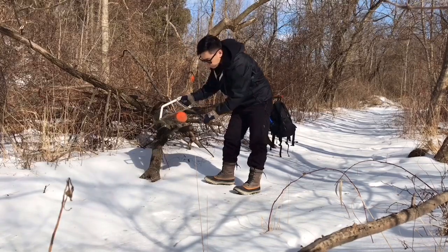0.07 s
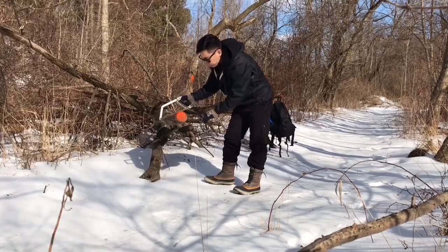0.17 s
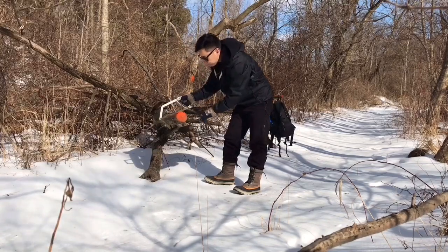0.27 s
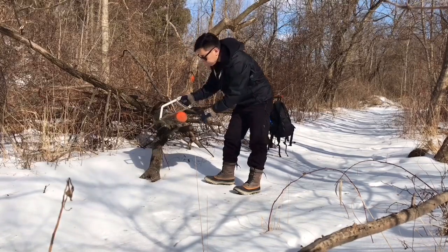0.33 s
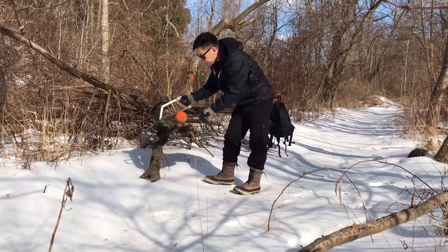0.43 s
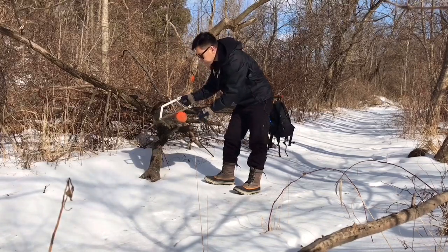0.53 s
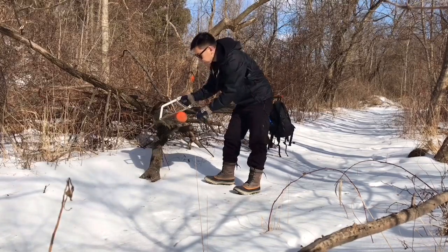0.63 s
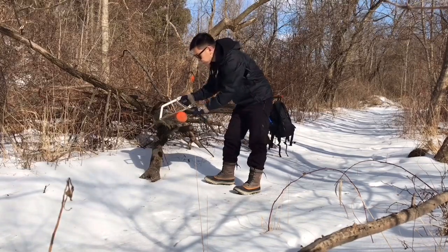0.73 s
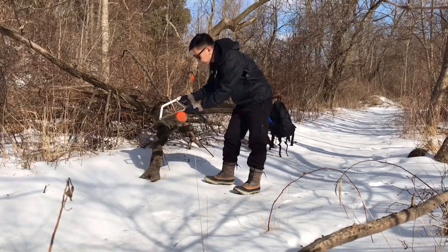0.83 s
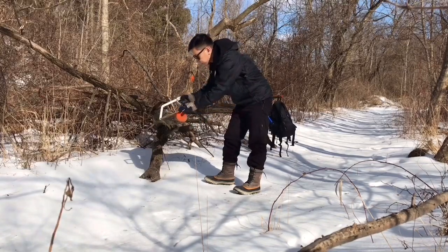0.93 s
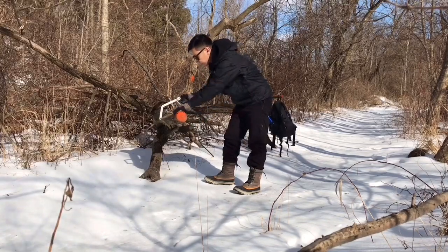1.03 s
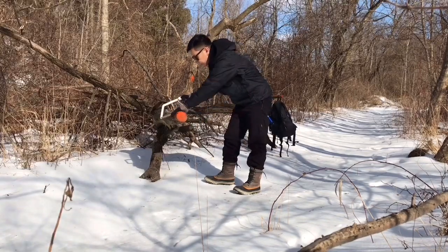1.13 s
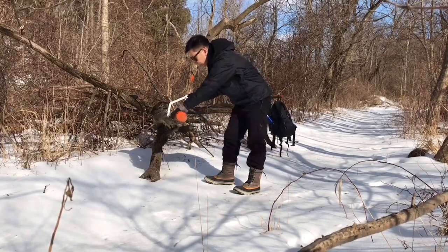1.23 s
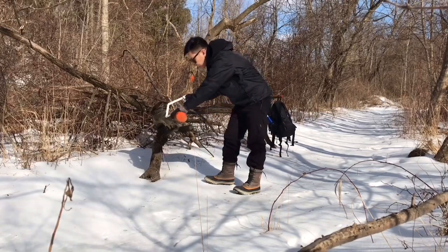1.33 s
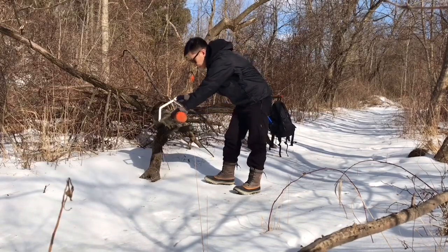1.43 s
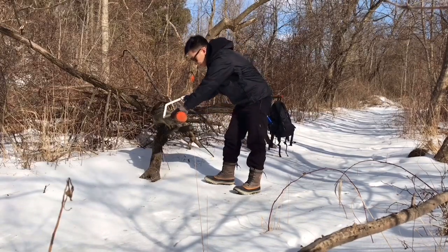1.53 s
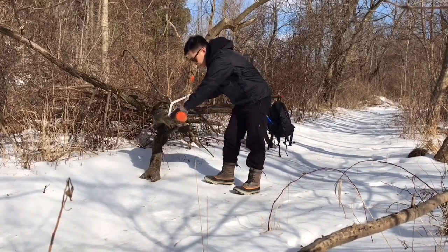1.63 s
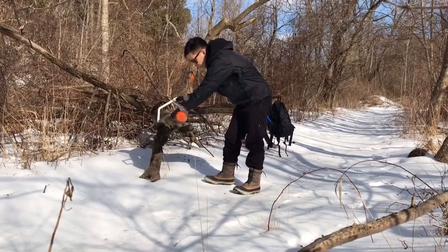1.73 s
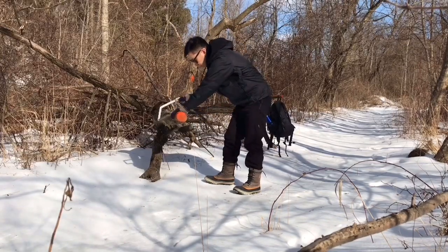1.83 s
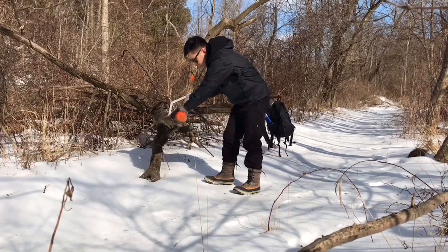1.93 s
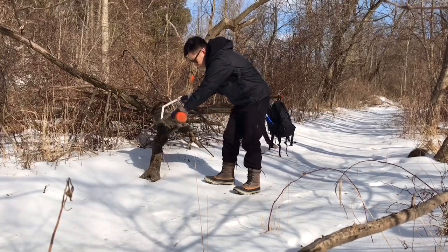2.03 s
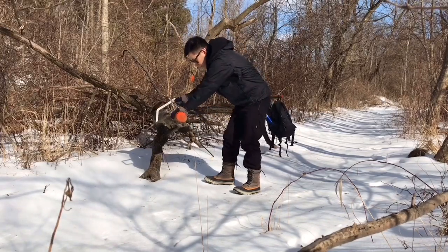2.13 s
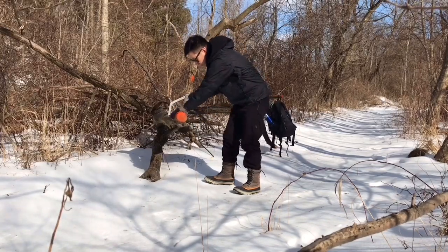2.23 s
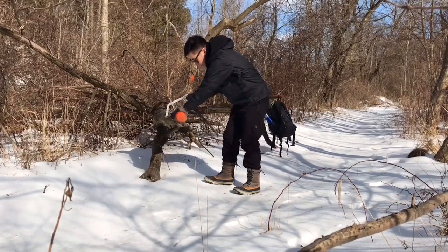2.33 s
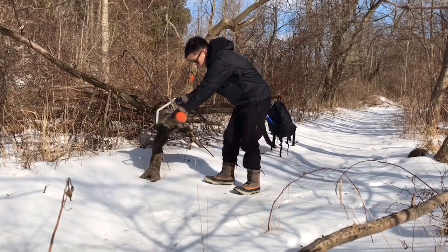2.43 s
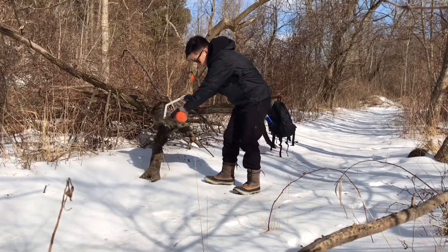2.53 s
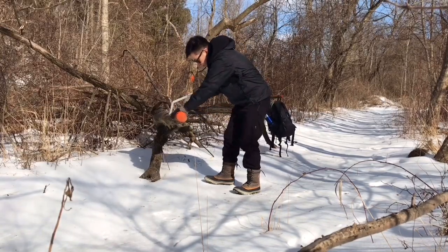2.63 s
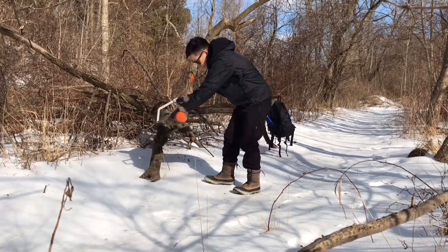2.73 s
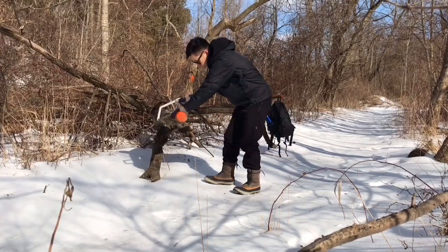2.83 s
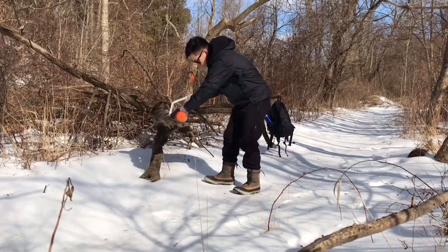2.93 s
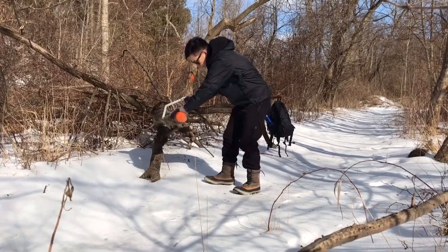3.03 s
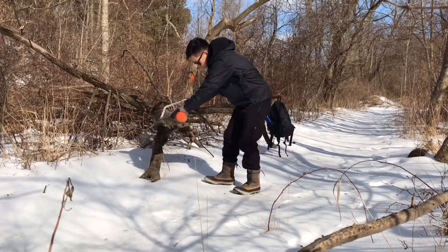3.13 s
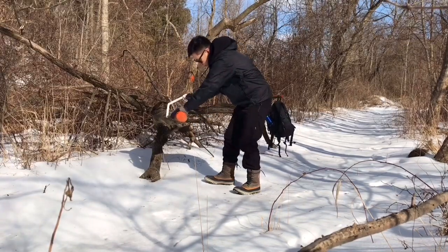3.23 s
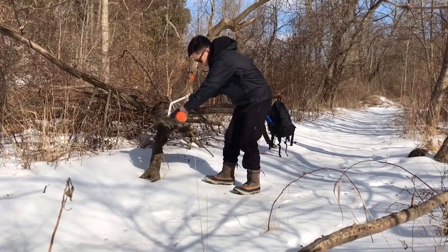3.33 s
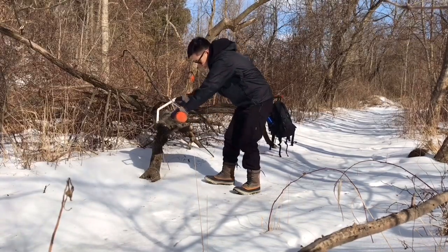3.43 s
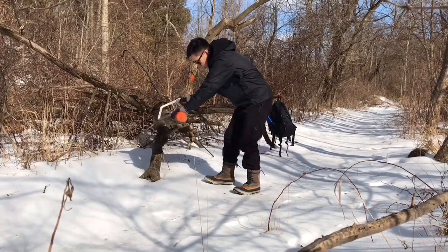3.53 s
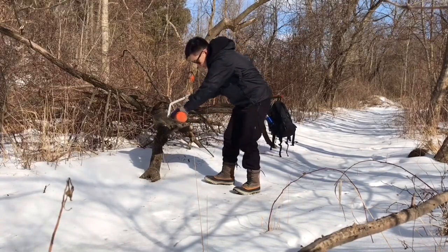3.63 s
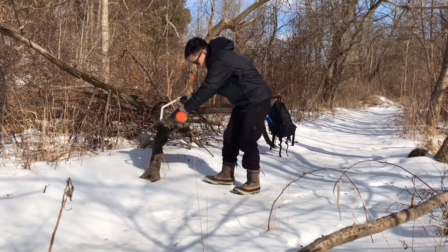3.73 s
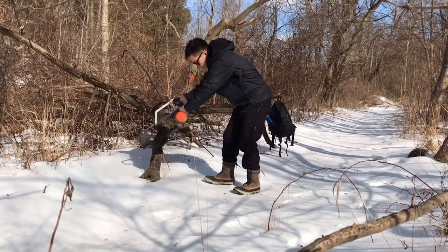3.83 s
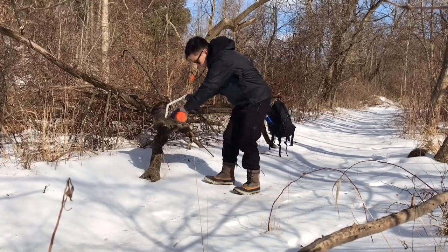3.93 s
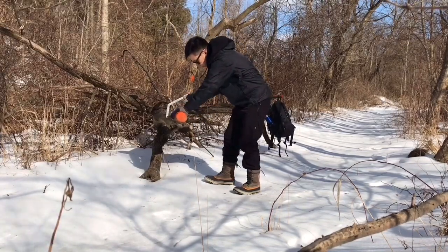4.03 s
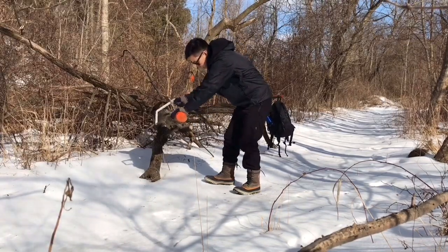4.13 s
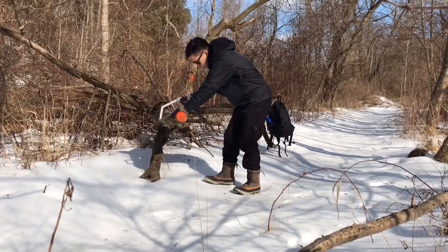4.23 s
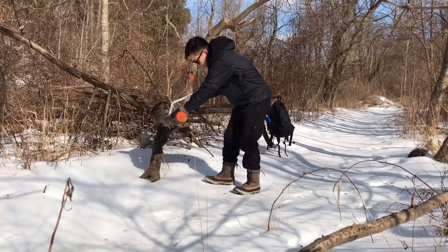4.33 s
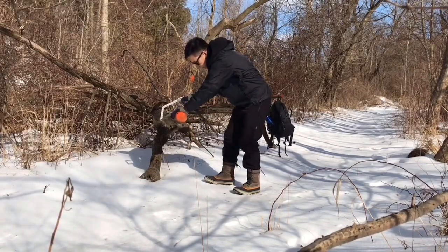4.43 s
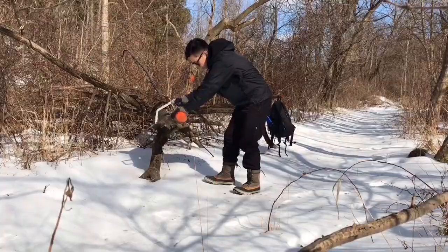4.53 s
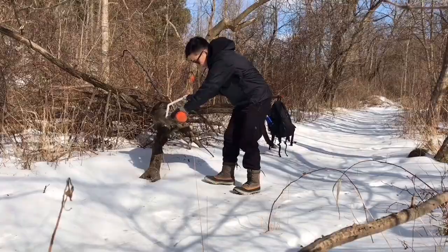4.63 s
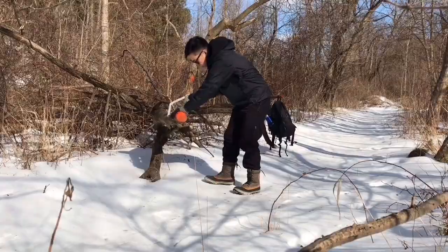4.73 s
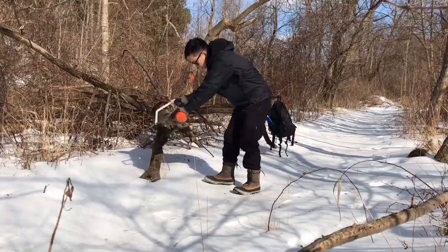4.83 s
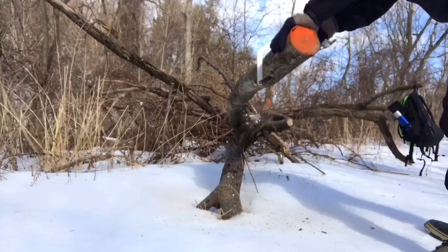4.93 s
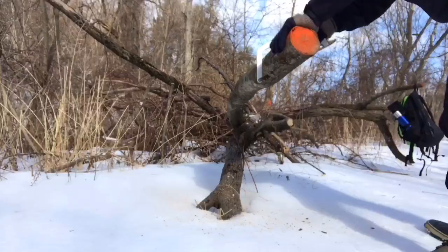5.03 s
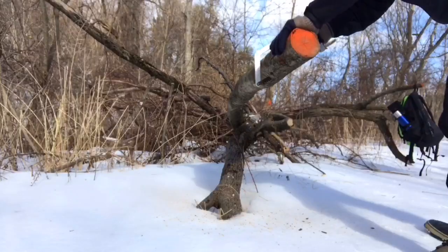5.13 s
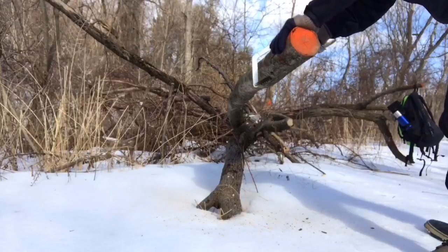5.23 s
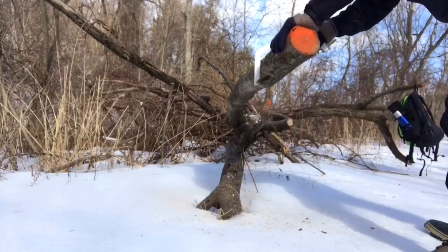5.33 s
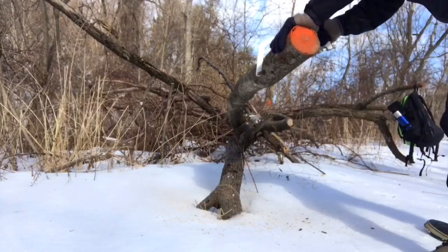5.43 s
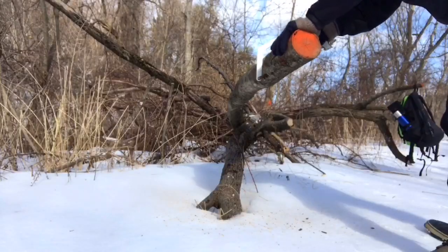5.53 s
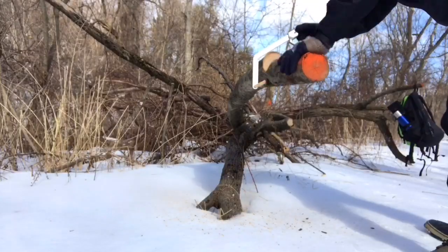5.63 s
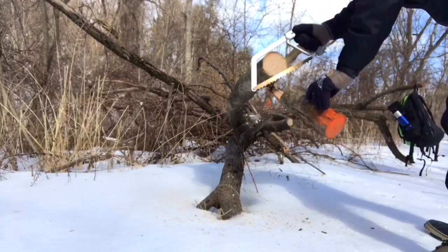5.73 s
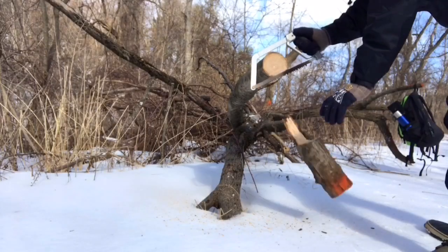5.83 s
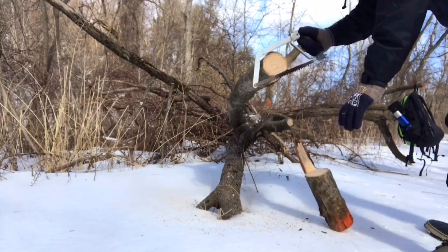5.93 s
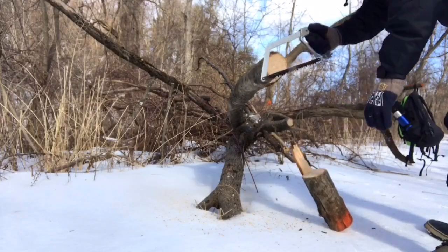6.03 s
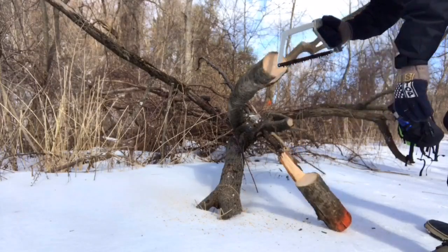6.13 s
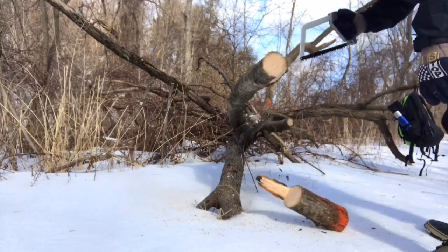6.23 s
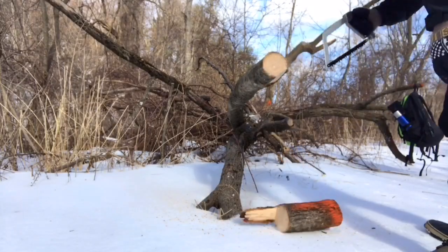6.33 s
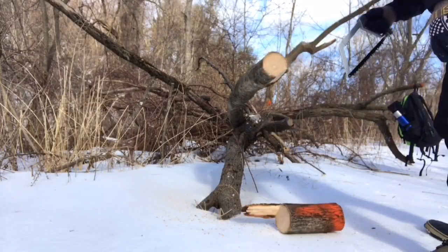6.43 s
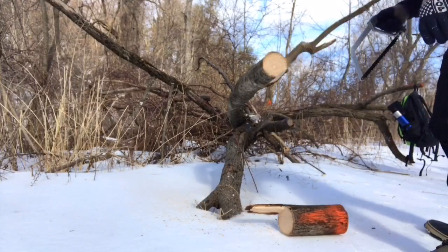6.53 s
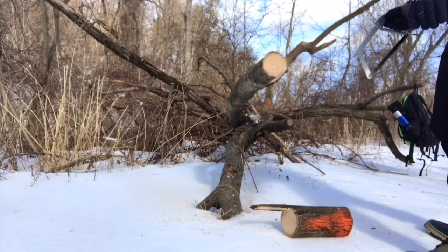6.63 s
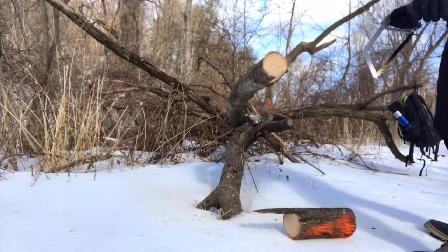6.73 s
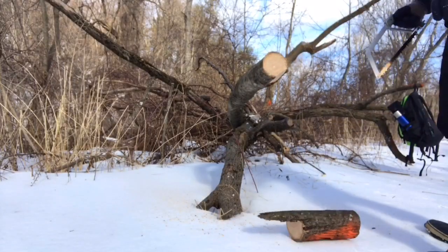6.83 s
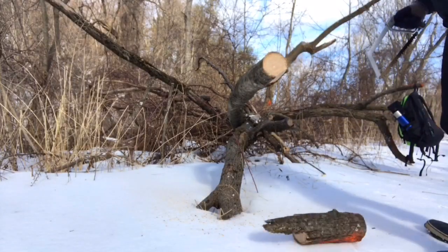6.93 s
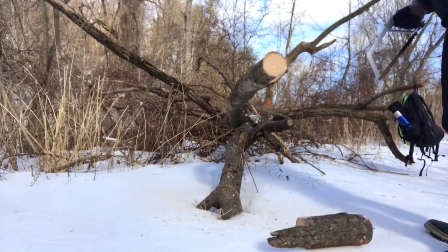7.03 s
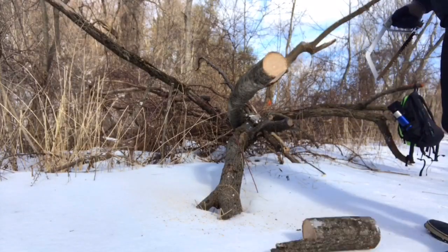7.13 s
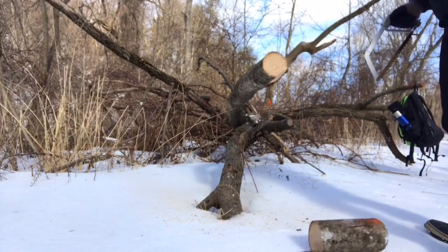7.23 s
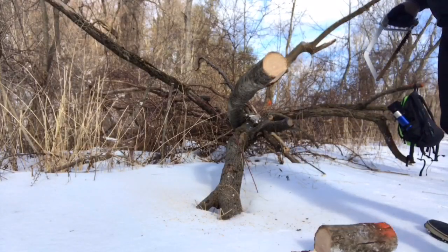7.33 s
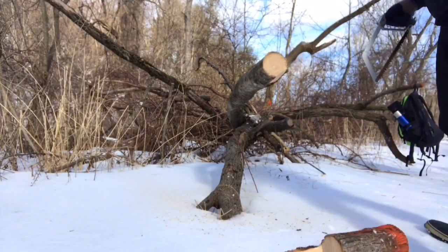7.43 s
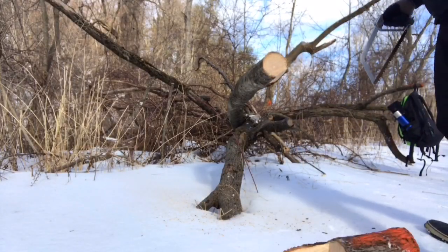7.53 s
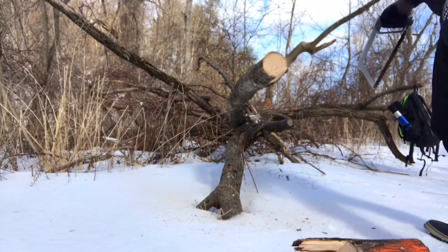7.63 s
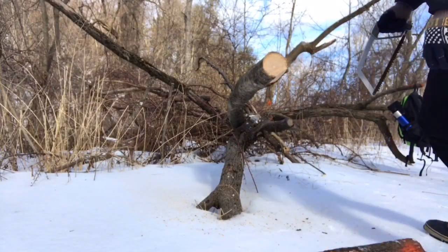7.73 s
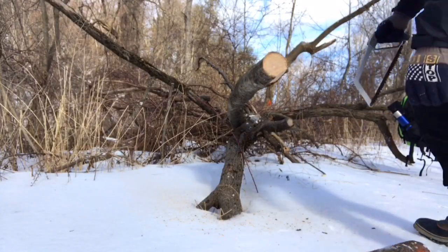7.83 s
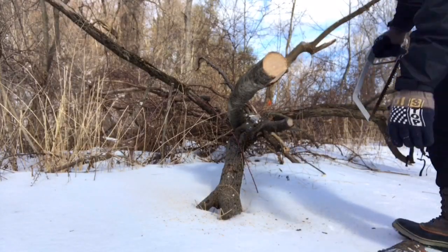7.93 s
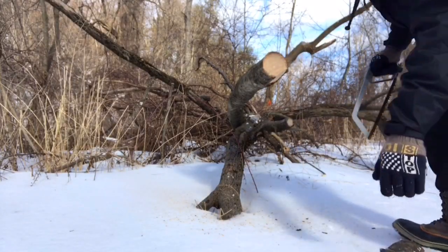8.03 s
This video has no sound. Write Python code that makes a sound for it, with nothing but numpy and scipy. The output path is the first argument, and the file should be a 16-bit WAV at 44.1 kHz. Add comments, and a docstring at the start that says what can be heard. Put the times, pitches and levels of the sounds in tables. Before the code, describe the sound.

Quick even saw strokes with a thin metallic ring, then loud splintering snaps, a log thumping onto crusty snow, rolling, and crunchy footsteps.

```python
"""A small bow saw cuts a dead branch in a snowy wood: grains gated by tooth bites ring blade and wood.
Closer by, the branch gives twice, splinters and snaps loudly twice: slip bursts, ringing modes, dull knocks.
The log drops on crusted snow and rolls, and boots shift: cracks, thuds, ticks and crunching grains.
Noise echoes from brush and trunks answer the sounds, over a distant low rumble and hum."""
import sys
import numpy as np
from scipy import signal
from scipy.fft import rfft, irfft, next_fast_len
from scipy.io import wavfile
from scipy.ndimage import map_coordinates

SR = 44100
rng = np.random.default_rng(int(sys.argv[2]) if len(sys.argv) > 2 else 0)


def file_out(sig):
    """Save sig as 16-bit WAV at sys.argv[1]."""
    # one column per channel
    cols = np.atleast_2d(sig).T
    # limit, then scale
    lim = np.clip(cols, -1, 1)
    pcm = np.round(lim * 32767).astype(np.int16)
    wavfile.write(sys.argv[1], SR, pcm)


N = 355887  # samples


def amp(db):
    """Decibels to amplitude."""
    return 10 ** (np.asarray(db) / 20)


def unit(x):
    """Scale to rms 1."""
    return x / np.sqrt(np.mean(x ** 2) + 1e-20)


def along(points, hz):
    """Interpolate (frequency [Hz], value) points on a log frequency axis."""
    point_hz, values = np.transpose(points)
    return np.interp(np.log(hz + 1), np.log(np.abs(point_hz)), values)


def wobble(knots_per_s):
    """Smooth random curve: a spline through normal random knots."""
    knots = rng.standard_normal(int(N * knots_per_s / SR) + 4)
    coarse = np.linspace(0, N, num=8192)
    curve = map_coordinates(knots, [coarse * knots_per_s / SR])
    return np.interp(np.arange(N), coarse, curve)


def filtered(x, response):
    """Multiply the spectrum of x by a complex response of frequency."""
    size = next_fast_len(len(x) + 8192)
    spectrum = rfft(x, size) * response(np.fft.rfftfreq(size, 1 / SR))
    return irfft(spectrum, size)[:len(x)]


def coloured(x, spectrum):
    """Minimum-phase filter of unit energy, shaped by (frequency [Hz], level [dB]) points."""
    size = 2048
    level_db = np.maximum(along(spectrum, np.fft.rfftfreq(size, 1 / SR)), -90)
    # folding the cepstrum makes the filter causal
    cepstrum = irfft(np.log(amp(level_db)))
    cepstrum[1:size // 2] *= 2
    cepstrum[size // 2 + 1:] = 0
    pulse = irfft(np.exp(rfft(cepstrum)))
    return signal.fftconvolve(x, pulse / np.linalg.norm(pulse))[:len(x)]


def resonant(x, modes):
    """Parallel resonances: (frequency [Hz], width [Hz], level [dB])."""
    def response(f):
        return sum(amp(db) * 1j * f * width / (hz * hz - f * f + 1j * f * width)
                   for hz, width, db in modes)
    return filtered(x, response)


def add(track, start_s, sound):
    """Mix a sound into the track."""
    part = track[round(start_s * SR):][:len(sound)]
    part += sound[:len(part)]


def burst(t, t60_s):
    """Dying run of tiny slips of either sign."""
    return np.sign(rng.standard_normal(len(t))) * amp(-60 * t / max(t60_s, .001))


def grains(per_s, spread_db):
    """Random impulses of uneven size, rms 1."""
    hits = rng.random(N) < per_s / SR
    return unit(hits * rng.standard_normal(N) * amp(spread_db * rng.standard_normal(N)))


def swell(t, start_s, length_s, rise_share):
    """Smooth rise from 0 to 1 and back, highest at the given share of its length."""
    top_s = start_s + length_s * np.clip(rise_share, .05, .95)
    half_turns = np.interp(t, [start_s, top_s, start_s + length_s], [0, .5, 1])
    return np.abs(np.sin(np.pi * half_turns))


def thud(t, hz, sag, life_cycles):
    """Low push whose pitch sinks from (0.67 + sag) towards 0.67 times hz as it dies."""
    cycles = hz * t
    settling = np.exp(-cycles / (0.11 * life_cycles))
    phase = np.cumsum(hz * (0.67 + sag * settling)) / SR
    return np.sin(2 * np.pi * phase) * amp(-60 * cycles / life_cycles) * (1 - settling)


def fracture(t, t60_s, slips_db, lag_s):
    """Main break and after-slips; stiff wood carries highs first, the delay being lag_s at 1 kHz."""
    push = amp(slips_db) * burst(t, t60_s)
    push[0] += 5
    return filtered(push, lambda f: np.exp(-4j * np.pi * lag_s * np.sqrt(1000 * f)))


# distant rumble and hiss: (frequency [Hz], relative level [dB])
AIR_SPECTRUM = [(15, -41), (28, -19.5), (48, -2.5), (107, -6), (216, -18), (301, -21.5), (485, -24.5),
                (849, -26.5), (1150, -27), (1860, -33.5), (2820, -37.5), (7000, -47.5), (10500, -52),
                (16000, -51)]
AIR_DB = -51
HUM_START_S, HUM_RISE_S, HUM_DB, HUM_FADE_DB_PER_S = 4.78, 0.088, -47, 1.6


def background():
    """Far rumble with faint hiss; low wavering hum from noise through two narrow resonances."""
    since_hum_s = np.arange(N) / SR - HUM_START_S
    air = unit(filtered(rng.standard_normal(N), lambda hz: amp(along(AIR_SPECTRUM, hz))))
    hum = resonant(rng.standard_normal(N), [(51.4, 19, 0)])
    hum = unit(resonant(hum, [(51.5, 16, 0)]))
    hum_gain = np.clip(since_hum_s / HUM_RISE_S, 0, 1) * amp(HUM_DB - HUM_FADE_DB_PER_S * since_hum_s)
    return amp(AIR_DB + 0.31 * wobble(0.92)) * air + hum_gain * hum


# far echo swelling as the sound reaches the far trunks: (delay [s], relative level [dB])
TRUNK_ECHO = [(0, -8), (.12, -6), (.3, -5.5), (.45, -2), (.62, -2), (.8, -13), (1.3, -34.5)]
# far echo colour: (frequency [Hz], relative level [dB])
TRUNK_SPECTRUM = [(150, -2.5), (600, -3), (1200, 4.5), (1750, -7), (2400, 0), (2850, -7), (4500, -5.5),
                  (6200, -10.5), (9000, -5.5), (15000, -7.5)]


def forest(x, near_db=-23, far_db=-34):
    """Nearby brush answers at once; far trunks return a faint, late, grainy echo."""
    t = np.arange(3 * SR // 2) / SR
    far_level_db = 3.6 * rng.standard_normal(len(t)) + np.interp(t, *np.transpose(TRUNK_ECHO))
    far = coloured(rng.standard_normal(len(t)) * amp(far_level_db), TRUNK_SPECTRUM)
    near = rng.standard_normal(len(t)) * amp(-60 * t / 0.23) * (t > .003)
    near = coloured(near, [(300, -1), (1000, 7.5), (3000, -2), (15000, -3.0)])
    echo = amp(near_db) * near / np.linalg.norm(near) + amp(far_db) * far / np.linalg.norm(far)
    return signal.fftconvolve(x, echo)[:N]


# snow under the log or a boot:
# (start [s], length [s], relative packing level [dB], relative crumbling level [dB])
CRUNCH_EVENTS = [(6.444, 0.18, -63, -73), (6.7, 0.124, -59, -68.5), (7.001, 0.15, -52.5, -59.5),
                 (7.481, 0.116, -59, -58), (7.653, 0.083, -50.5, -69), (7.745, 0.12, -53, -62.5),
                 (7.762, 0.018, -62, -41), (7.869, 0.23, -47, -55)]
# snow under weight: (frequency [Hz], relative level [dB])
PACKING_SPECTRUM = [(130, -4), (250, -2), (450, -2.5), (800, -0.5), (1200, -6.5), (2000, -15), (4000, -23),
                    (8000, -30)]
# crumbling snow: (frequency [Hz], relative level [dB])
CRUMBLE_SPECTRUM = [(1200, -18.5), (3200, 5), (6000, 1.5), (10000, -7), (15500, -9.5)]
CRUNCH_RISE_SHARE, CRUNCH_POWER = 0.46, 1.1  # position of greatest weight; sharpness of its peak
ROLL_START_S, ROLL_CRUMBLING_REL_DB = 7.2, -70.5


def snow():
    """Snow packs and crumbles under the rolling log and the boots: weight-driven grains."""
    t = np.arange(N) / SR
    packing = np.zeros(N)
    crumbling = amp(ROLL_CRUMBLING_REL_DB) * (t > ROLL_START_S)
    for start_s, length_s, packing_db, crumbling_db in CRUNCH_EVENTS:
        weight = swell(t, start_s, length_s, CRUNCH_RISE_SHARE) ** CRUNCH_POWER
        packing += amp(packing_db) * weight
        crumbling += amp(crumbling_db) * weight
    packed = unit(coloured(grains(per_s=2700, spread_db=4), PACKING_SPECTRUM))
    crumbled = unit(coloured(grains(per_s=2200, spread_db=1.5), CRUMBLE_SPECTRUM))
    return packing * packed + amp(-3.5) * crumbling * crumbled


CRUMB_REL_DB, CRUMB_SCATTER_DB, CRUMB_HZ = -49.5, 1.5, 3770


def crumbs(count=34):
    """Lesser crumbs break at random while the log rolls; rows as in TICK_EVENTS."""
    times_s = rng.uniform(ROLL_START_S, N / SR, count)
    size, pitch = rng.standard_normal((2, count))
    return list(zip(times_s, CRUMB_REL_DB + CRUMB_SCATTER_DB * size, CRUMB_HZ * np.exp(.35 * pitch)))


# loudest bark and ice crumbs: (nominal time [s], relative peak level [dB], centre [Hz])
TICK_EVENTS = [(6.572, -37.5, 1890), (6.6733, -43, 3510), (6.8005, -39.5, 2000), (7.0007, -30.5, 3540),
               (7.2029, -36, 4500), (7.2121, -33.5, 6500), (7.3084, -41, 2210), (7.4951, -22, 3800),
               (7.512, -42, 3900), (7.5205, -39, 4500), (7.5349, -30, 3040), (7.6932, -38, 5500),
               (7.9835, -35, 1900), (8.036, -35, 1910)]


def ticks():
    """Small brittle snaps, each a fracture coloured by one broad resonance."""
    out, t = np.zeros(N), np.arange(SR // 20) / SR
    for time_s, db, hz in list(TICK_EVENTS) + crumbs():
        colour = [(hz / 8, -18), (hz * 0.96, 0), (hz * 1.2, -3), (hz * 1.7, -9), (hz * 4.7, -15)]
        snap = fracture(t, 0.0067, slips_db=-0.5, lag_s=0) + amp(-17.5) * burst(t, 0.03)
        tick = coloured(snap, colour)
        add(out, time_s + 0.00072, amp(db + 4.5) * tick / np.abs(tick).max())
    return out


# log on crusted snow: (nominal time [s], relative crack level [dB], crack t60 [s],
# relative thud level [dB], nominal thud pitch [Hz])
LANDING_EVENTS = [(5.9876, -11, 0.023, -31.5, 115), (6.3581, -32.5, 0.036, -63, 148.8),
                  (6.403, -17, 0.016, -26.5, 170), (6.4379, -35.5, 0.03, -64, 150),
                  (7.707, -48, 0.015, -32.5, 430), (7.767, -41, 0.0135, -38.5, 167)]
# cracking crust: (frequency [Hz], relative level [dB])
CRUST_SPECTRUM = [(150, -34), (250, 1.5), (450, -8), (900, -8), (1640, -6.5), (2960, -6), (3800, -1.5),
                  (4820, -10.5), (6900, -7.5), (9170, -18), (9830, -13.5), (16000, -15.5)]


def falling_log():
    """The crust cracks, and the soft snow below gives a short thud of sinking pitch."""
    out, t = np.zeros(N), np.arange(SR // 5) / SR
    for time_s, crack_db, t60_s, thud_db, thud_hz in LANDING_EVENTS:
        crust = fracture(t, t60_s, slips_db=-0.5, lag_s=0.0015) + amp(-23.5) * burst(t, 0.084)
        crack = amp(crack_db - 3.0) * coloured(crust, CRUST_SPECTRUM)
        push = amp(thud_db + 9.5) * thud(t, hz=thud_hz, sag=1.3, life_cycles=7.8)
        add(out, time_s - .0005, crack + push)
    return out


# runs of splintering fibres: (start [s], length [s], first mean relative level [dB],
# last mean relative level [dB], crack t60 [s], first bandwidth [Hz], last bandwidth [Hz])
SPLINTER_RUNS = [(5.6939, .029, -27.5, -16.5, 0.05, 2600, 8540),
                 (5.823, .012, -30.5, -30, 0.014, 10990, 12050)]
# nominal time between fibres; level spread; branch ring relative to each crack
SPLINTER_GAP_S, SPLINTER_SCATTER_DB, SPLINTER_RING_DB = .0046, 3.5, -21.5


def splinters():
    """Fibres part in quick runs, on average ever stronger and brighter; rows as in BREAK_EVENTS."""
    rows = []
    for start_s, length_s, first_db, last_db, t60_s, first_hz, last_hz in SPLINTER_RUNS:
        for share in np.linspace(0, 1, round(length_s / SPLINTER_GAP_S) + 1):
            time_s = start_s + share * length_s + rng.normal(0, 0.16) * SPLINTER_GAP_S
            db = first_db + share * (last_db - first_db) + rng.normal(0, SPLINTER_SCATTER_DB)
            bandwidth_hz = first_hz * (last_hz / first_hz) ** share
            rows.append((time_s, db, t60_s, bandwidth_hz, db + SPLINTER_RING_DB))
    return rows


# branch gives twice with dull knocks, then snaps loudly twice: (nominal time [s],
# relative crack level [dB], crack t60 [s], crack bandwidth [Hz], relative branch ring level [dB])
BREAK_EVENTS = [(5.0526, -38, .025, 1810, -22.5), (5.4825, -44, 0.032, 1495, -28),
                (5.726, -2, 0.016, 12000, -22.5), (5.7469, 0, 0.015, 19000, -28)]
# branch modes: (frequency [Hz], mean relative level [dB], t60 [s])
BRANCH_MODES = [(206.3, -18, 0.22), (311.3, -7, 0.06), (398, -8.5, 0.084), (517, -6.5, 0.07),
                (627, -15.5, .08), (684, -18.5, 0.2), (910, -22, 0.042), (1240, -24.5, 0.051),
                (1530, -20.5, 0.067)]
# splitting wood: (frequency [Hz], relative level [dB])
SPLIT_SPECTRUM = [(200, -19), (373, -13.5), (950, -6.5), (1250, -14.5), (1710, 1.5), (2210, -8.5),
                  (2800, -1.5), (3370, -9.5), (3970, -6), (4500, -13), (6100, -3), (8420, -15.5),
                  (13600, -16.5), (16000, -17.5)]


def branch():
    """Fibres splinter in quick runs before and after two loud snaps; each break shakes the branch."""
    out, t = np.zeros(N), np.arange(SR // 4) / SR
    knock_spectrum = [(130, -23.0), (380, 0.5), (700, -8.0), (2200, -25.5), (6000, -53.5)]
    for time_s, crack_db, t60_s, top_hz, ring_db in list(BREAK_EVENTS) + splinters():
        crack = coloured(fracture(t, t60_s, slips_db=-3.0, lag_s=0.0013), SPLIT_SPECTRUM)
        crack = filtered(crack, lambda f: 1 / (1 + .7j * f / top_hz) ** 2)
        ring = np.zeros(len(t))
        for hz, level_db, mode_t60_s in BRANCH_MODES:
            decay = amp(level_db + rng.normal(0, 3.9) - 60 * t / mode_t60_s)
            ring += decay * np.sin(2 * np.pi * (hz * t + rng.random()))
        # the limb flexes with a dull, rough knock
        flex = amp(-2.0) * thud(t, hz=438, sag=0.62, life_cycles=28)
        flex += amp(-9.5) * coloured(burst(t, 0.12), knock_spectrum)
        shaking = (amp(-1.0) * ring + flex) * (1 - np.exp(-t / 0.0022))
        add(out, time_s - .0005, amp(crack_db - 0.5) * crack + amp(ring_db) * shaking)
    return out


# saw strokes, push and pull in turn: (start [s], length [s], relative level [dB])
STROKE_EVENTS = [(1.23, .185, -56.5), (1.432, .16, -42), (1.603, .155, -45), (1.753, .18, -39),
                 (1.925, .18, -42.5), (2.078, .19, -38), (2.255, .177, -42.5), (2.405, .2, -37.5),
                 (2.595, .16, -41.5), (2.742, .198, -38.5), (2.92, .178, -42), (3.09, .157, -39.5),
                 (3.29, .14, -56), (3.449, .19, -42.5), (3.618, .172, -44.5), (3.8, .16, -38.5),
                 (3.965, .17, -42.5), (4.145, .155, -36.5), (4.312, .172, -45.5), (4.487, .185, -38.5),
                 (4.66, .175, -44), (4.862, .1, -41), (4.965, .13, -52), (5.133, .062, -51.5),
                 (5.228, .062, -51), (5.415, .1, -67), (5.63, .085, -57.5)]
# teeth snag hard and tear free: (time [s], relative level [dB])
SNAG_EVENTS = [(1.321, -46.5), (2.128, -33.5), (2.774, -39), (2.947, -39.5), (3.173, -36.5), (3.495, -36),
               (3.828, -34), (4.207, -35), (4.524, -40), (4.9, -38.5), (4.925, -38), (5.163, -44)]
# blade and frame: (frequency [Hz], width [Hz], relative level [dB])
BLADE_MODES = [(4280, 140, -9), (5410, 120, -8.5), (6170, 57, 3.5), (6475, 260, -2), (7260, 180, -5),
               (7770, 80, -4.5), (8730, 210, -5), (9084, 90, -4.5), (11100, 110, -16), (11730, 310, -8),
               (13110, 170, -5), (13330, 200, -2), (13850, 280, -9.5), (15100, 60, -8), (15500, 230, -3)]
# lightly damped taut-blade modes, singing on between strokes:
# (frequency [Hz], width [Hz], relative level [dB])
SINGING_MODES = [(6300, 28, -2.5), (7650, 16, -4), (9280, 28, -11.5), (13400, 23, -6)]
# wood round the cut: (frequency [Hz], width [Hz], relative level [dB])
KERF_MODES = [(772, 130, -0.5), (1040, 86, 0), (1690, 80, 6), (2238, 490, -10), (3350, 1630, -12.5)]
# strands left in the cut: (frequency [Hz], width [Hz], relative level [dB])
STRAND_MODES = [(1650, 400, -2.5), (3326, 900, -1)]
# torn fibres: (frequency [Hz], relative level [dB])
FIBRE_SPECTRUM = [(300, -33), (700, -3), (2000, -3), (3200, -3.5), (5500, -4.5), (6800, 0), (9000, -3.5),
                  (9900, -5), (13500, 2), (15500, 0), (15900, -17)]
FASTEST_SHARE, FORCE_POWER = .44, 2.5  # position of top speed in a stroke; force = speed ** power
USUAL_REL_DB, RASP_DB_PER_FORCE_DB = -43.5, 0.45  # usual stroke; growth of wood rasp
OPEN_S, OPEN_RASP_DB = 4.963, 7  # cut gapes from here, blade rubs the strands left


def saw(tooth_hz=950, chatter_hz=70, chatter_db=2.5, bite_cycles=0.6, roam_db=4.5, grip_db=1.87):
    """Teeth tear fibres at a rate set by the stroke speed; blade and wood ring with them."""
    t = np.arange(N) / SR
    speed, force, rasp = np.zeros((3, N))
    for start_s, length_s, db in STROKE_EVENTS:
        on = slice(int(start_s * SR), int((start_s + length_s) * SR))
        swing = swell(t[on], start_s, length_s, FASTEST_SHARE)
        rasp_db = USUAL_REL_DB + RASP_DB_PER_FORCE_DB * (db - USUAL_REL_DB)
        speed[on] += swing
        force[on] += amp(db) * swing ** FORCE_POWER
        rasp[on] += amp(rasp_db) * swing ** (FORCE_POWER * 0.57)
    # uneven grip; a snag is a sudden jump in cutting force
    force *= amp(grip_db * wobble(45))
    after = t[:SR // 20]
    for time_s, db in SNAG_EVENTS:
        add(force, time_s, amp(db - 60 * after / 0.038) * (1 - np.exp(-after / 0.0016)))
    # the blade judders several times in a stroke
    judder_cycles = np.cumsum(chatter_hz * (1 + .35 * wobble(40))) / SR
    chatter = amp(chatter_db * np.sin(2 * np.pi * judder_cycles) + 1.7 * wobble(60))
    # each tooth bites hard, then lets go
    tooth_cycles = np.cumsum(tooth_hz * speed * (1 + .12 * wobble(150))) / SR
    bites = chatter * np.exp(-(tooth_cycles % 1) / bite_cycles)
    on_steel = unit(bites * grains(per_s=13000, spread_db=0))
    on_wood = unit(bites * grains(per_s=13000, spread_db=0))
    # the contact travels along the blade, so its modes take turns
    steel = np.zeros(N)
    for group in range(3):
        steel += amp(roam_db * wobble(35)) * resonant(on_steel, BLADE_MODES[group::3])
    steel = unit(steel)
    singing = unit(resonant(force * on_wood, SINGING_MODES)) * np.sqrt(np.mean(force ** 2))
    fibres = unit(coloured(on_wood, FIBRE_SPECTRUM))
    wood = unit(resonant(on_steel, KERF_MODES))
    # the gaping cut lets go of the blade, and the strands rasp instead
    gaping = t > OPEN_S
    strands = gaping * amp(OPEN_RASP_DB) * unit(resonant(on_wood, STRAND_MODES))
    cutting = force * (amp(-3.5 - 4.5 * gaping) * steel + amp(-5.0) * (fibres + strands))
    return cutting + amp(-23.0) * singing + amp(-9.5) * rasp * wood


def scene():
    """The saw is the farthest source bar the background and carries the most echo."""
    sawing = saw()
    close = branch() + falling_log() + ticks() + snow()
    echo = forest(close + amp(7.5) * sawing)
    return (sawing + close + echo + background())[None]


def record(dry, top_hz=16000):
    """Loud peaks saturate softly; the treble falls steeply above top_hz."""
    held = dry[0] / (1 + dry[0] ** 4) ** (1 / 4)
    return filtered(held, lambda hz: 1 / (1 + (hz / top_hz) ** 160))[None]


dry = scene()
out = record(dry)
file_out(out)
```